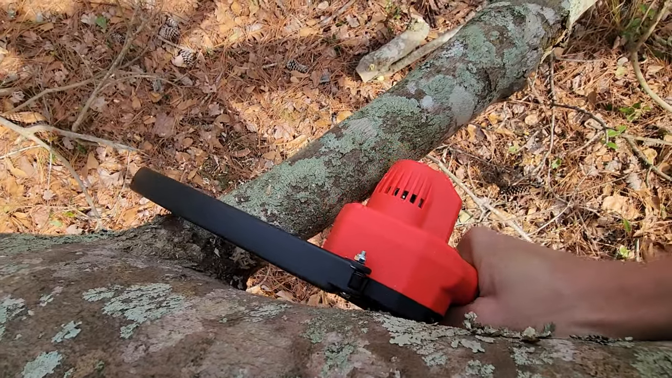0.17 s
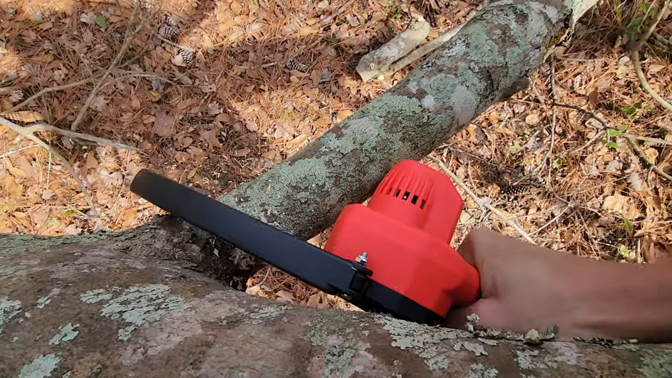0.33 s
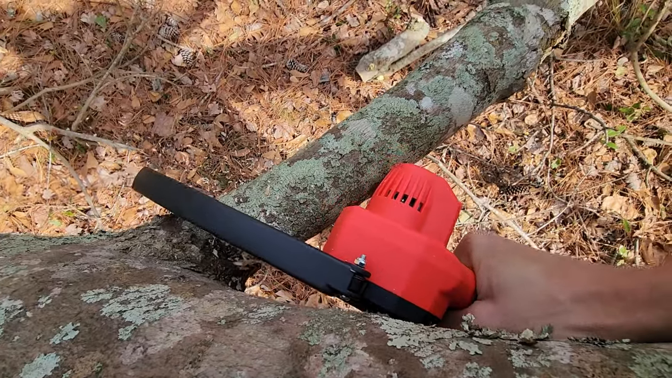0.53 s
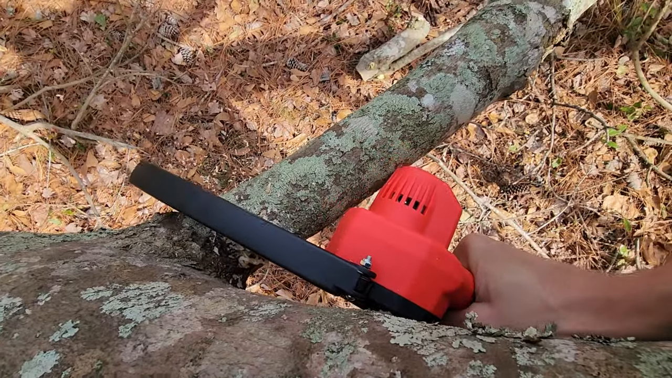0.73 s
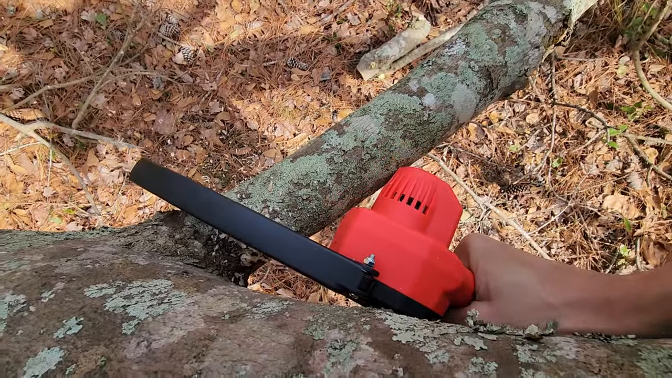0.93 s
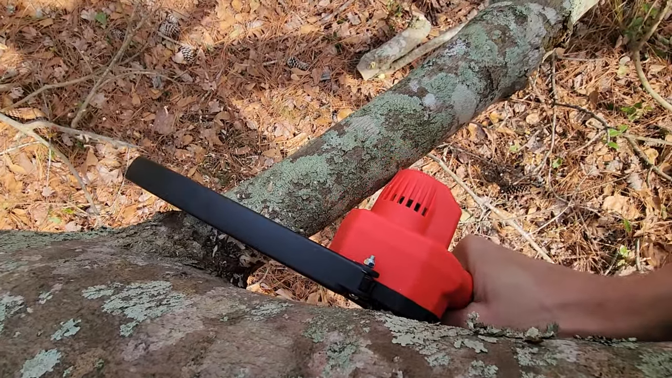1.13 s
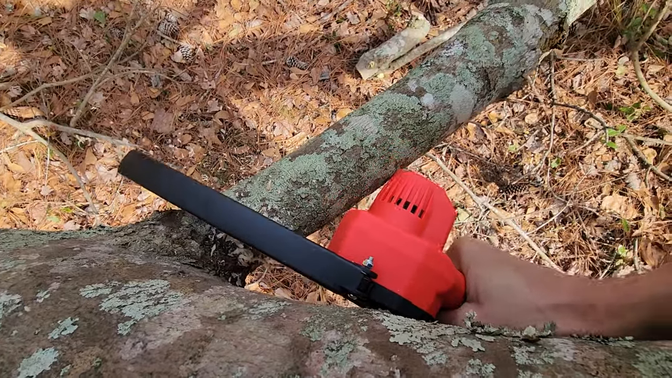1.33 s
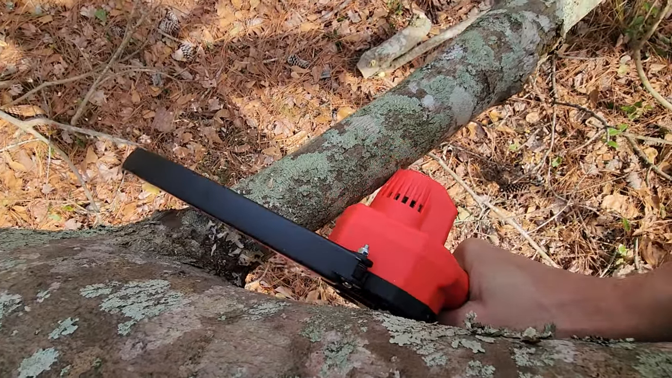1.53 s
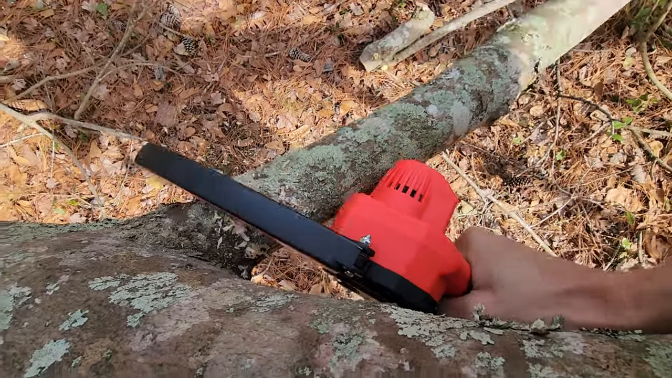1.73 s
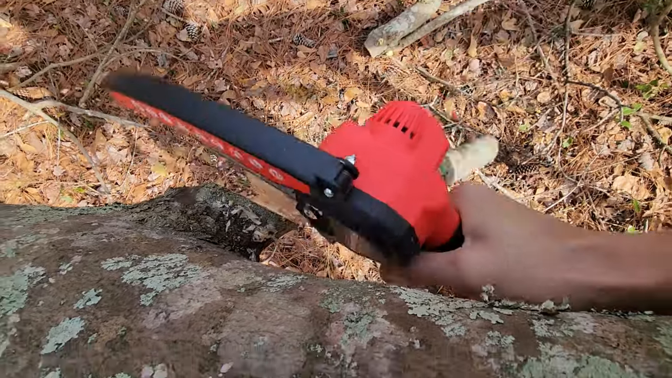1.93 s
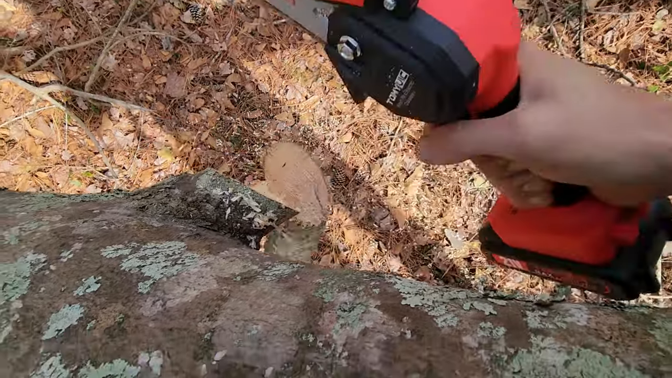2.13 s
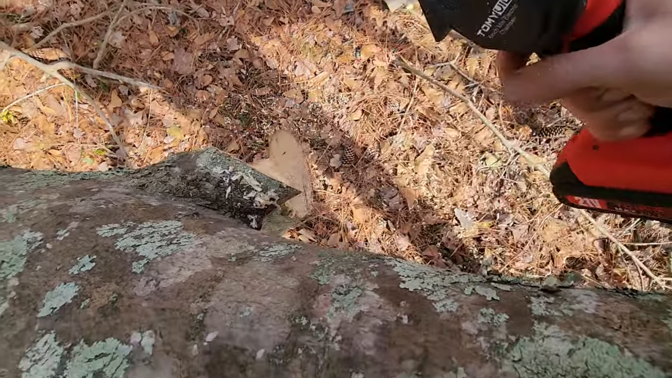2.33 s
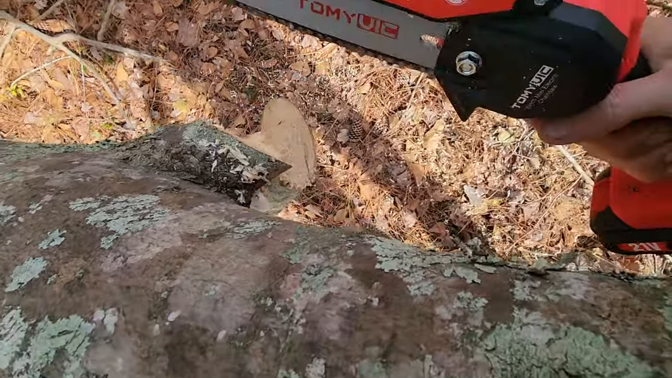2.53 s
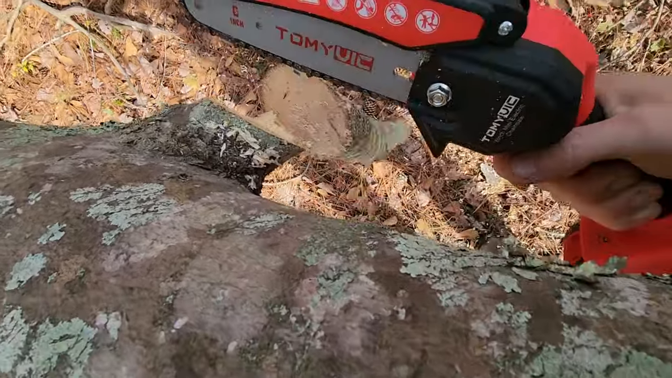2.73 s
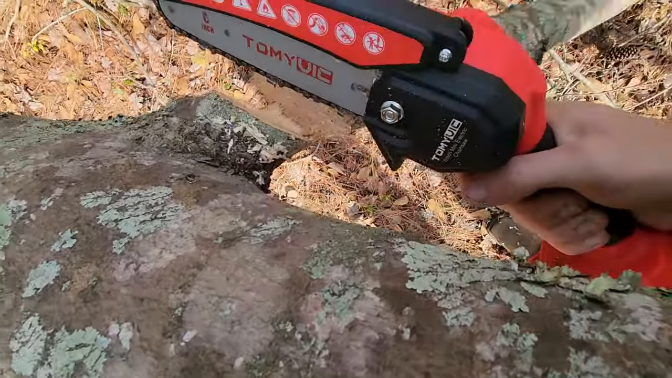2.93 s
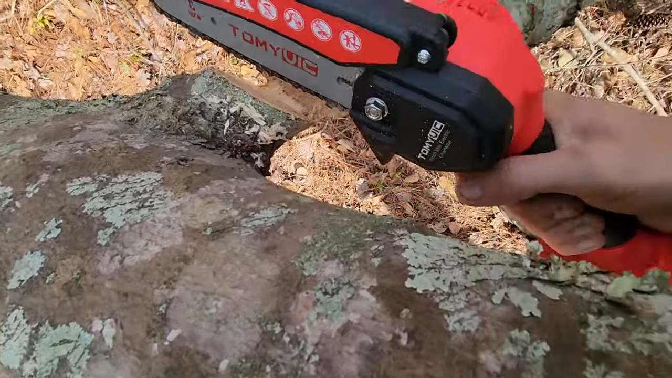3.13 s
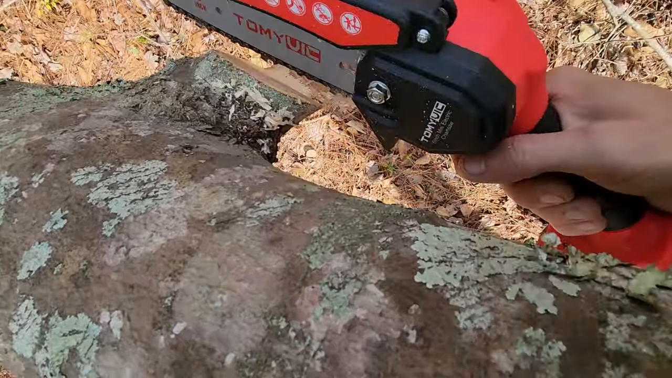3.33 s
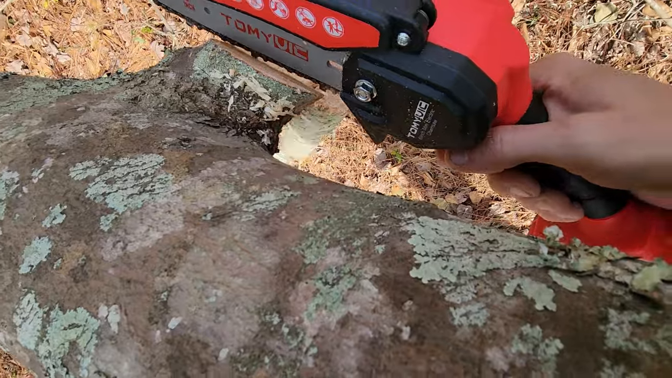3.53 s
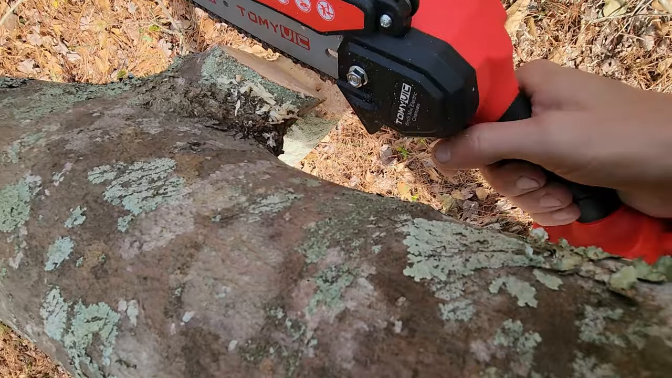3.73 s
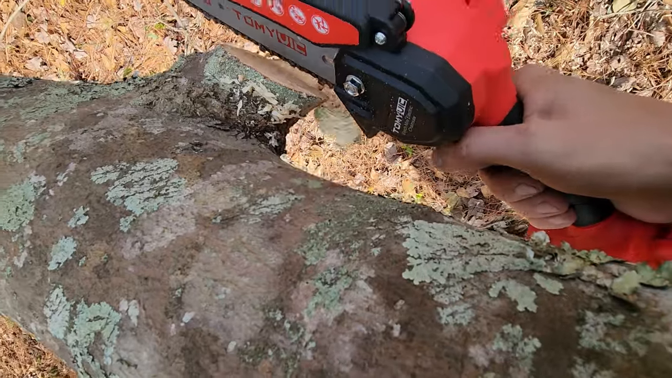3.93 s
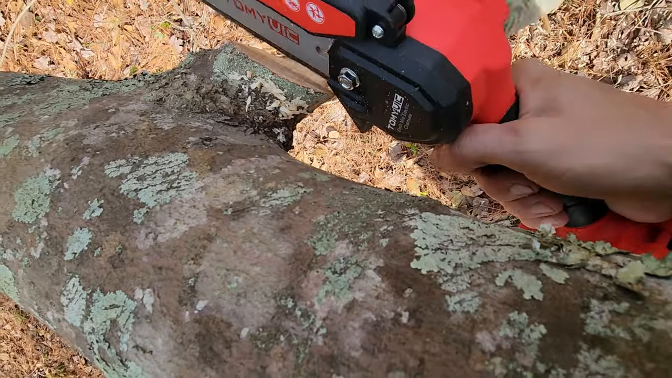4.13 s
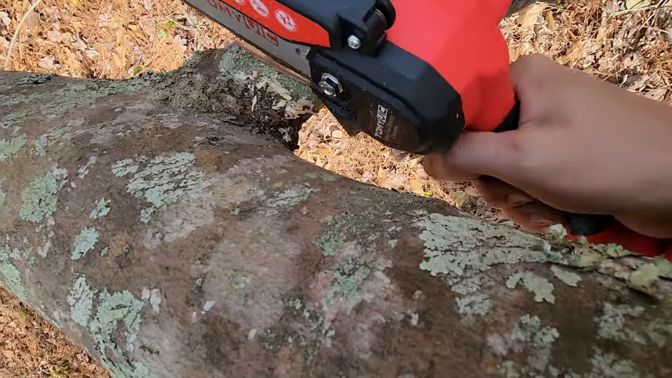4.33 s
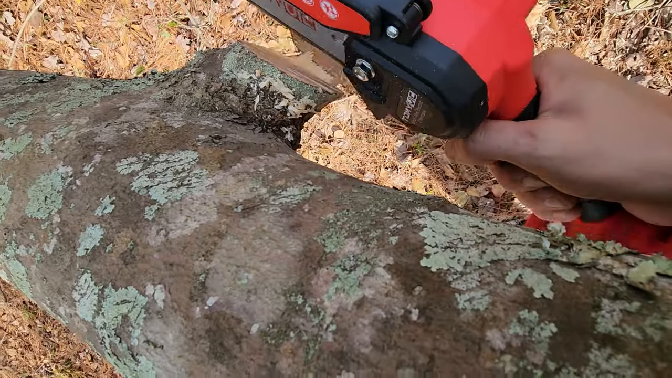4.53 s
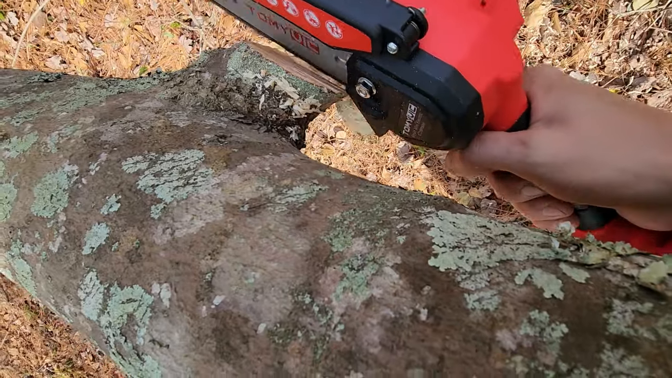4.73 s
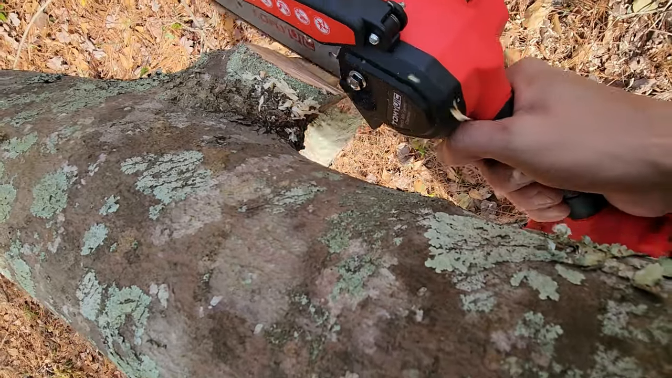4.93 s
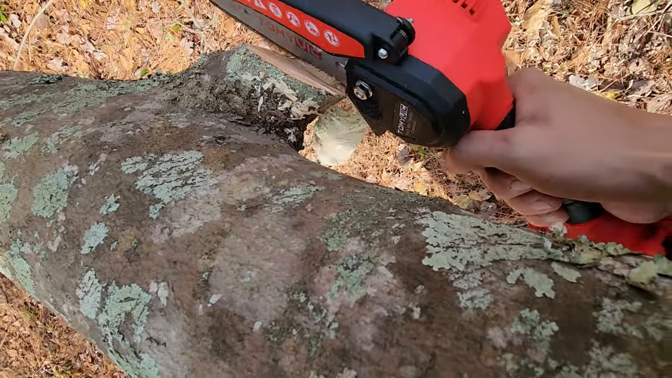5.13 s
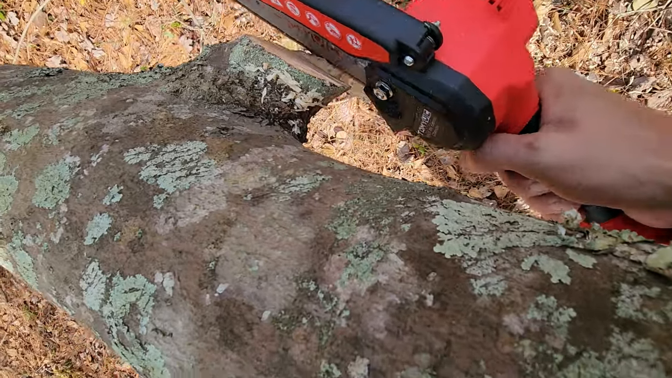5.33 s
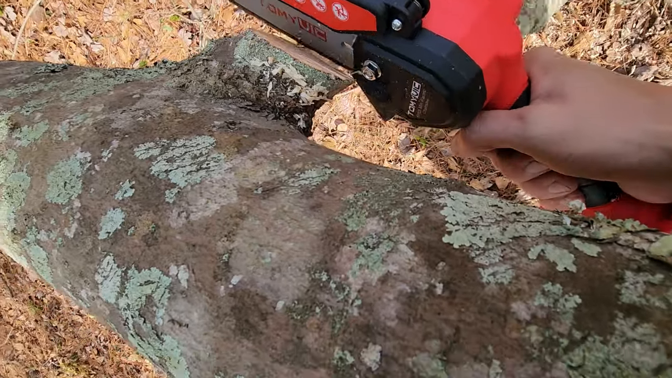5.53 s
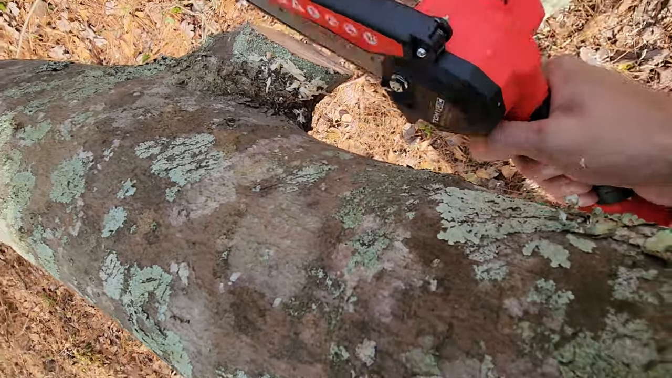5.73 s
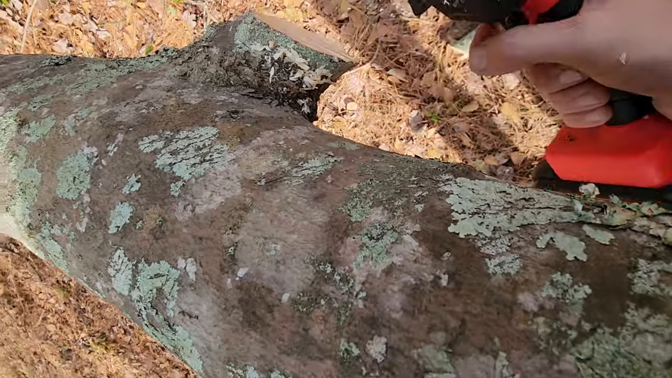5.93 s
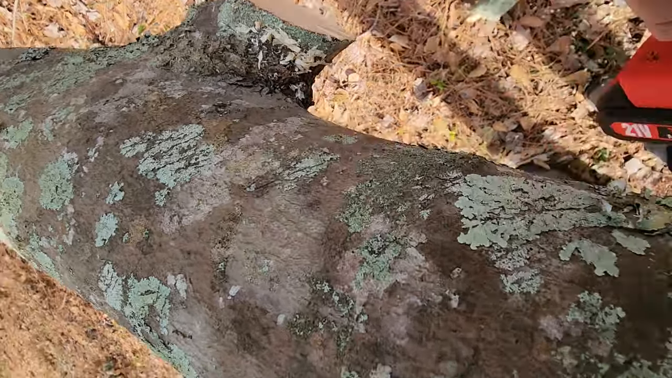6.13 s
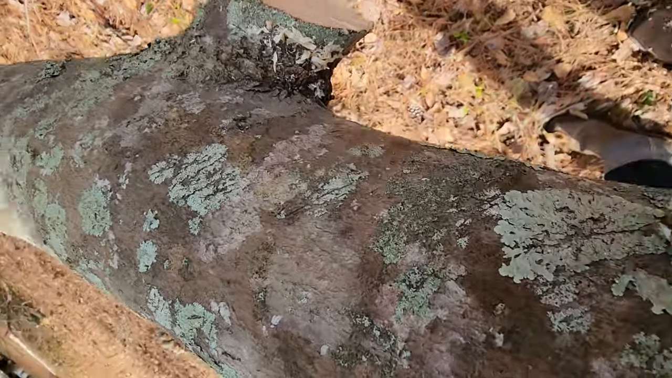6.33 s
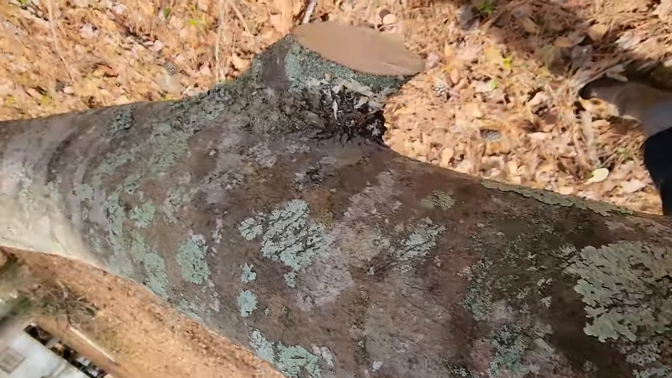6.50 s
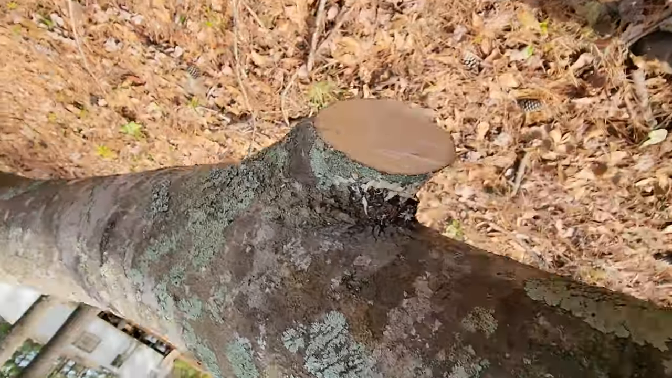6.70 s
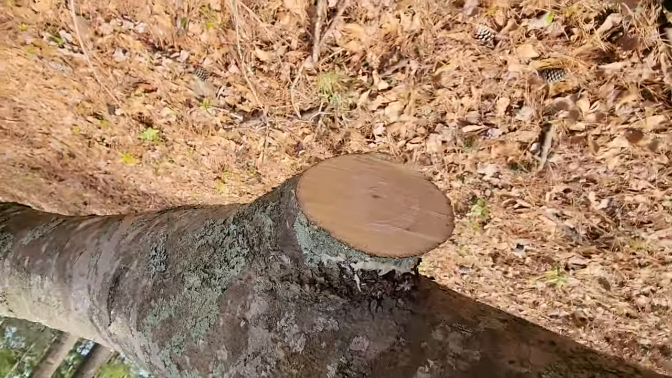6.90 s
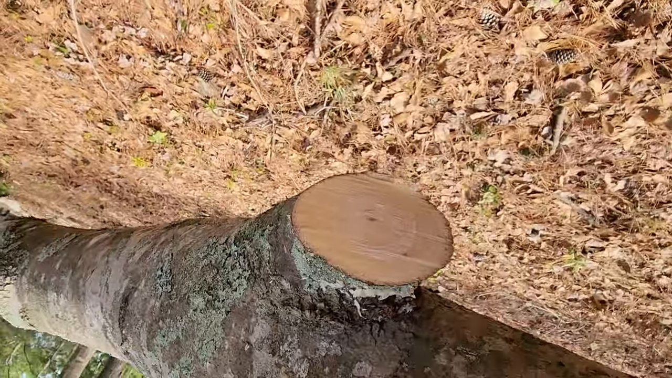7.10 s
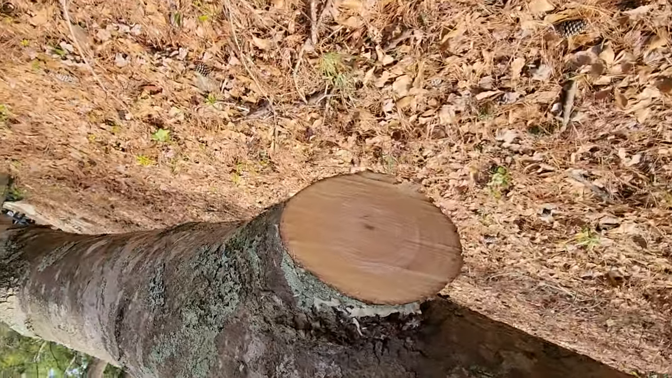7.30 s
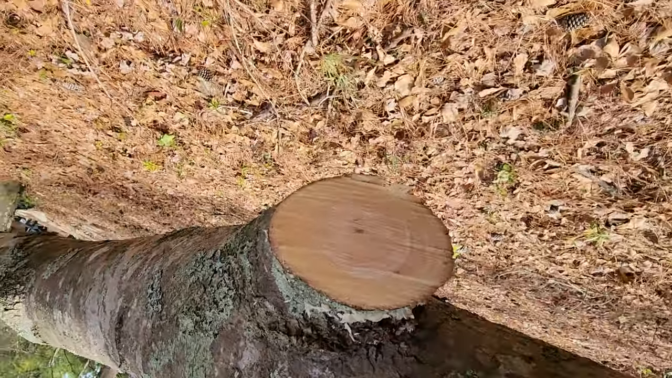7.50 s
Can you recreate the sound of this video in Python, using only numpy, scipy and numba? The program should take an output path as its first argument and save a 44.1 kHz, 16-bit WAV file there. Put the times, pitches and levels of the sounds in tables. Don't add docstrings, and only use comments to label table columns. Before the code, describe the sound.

Close battery saw roars and squeals in wood, winds down, pauses quietly, kicks through a second cut with a thump, then leaves and twigs crunch.

```python
import sys
import numpy as np
from scipy import signal
from scipy.fft import rfft, irfft, next_fast_len
from scipy.io import wavfile
from scipy.ndimage import uniform_filter1d
from numba import njit

SR = 44100
rng = np.random.default_rng(int(sys.argv[2]) if len(sys.argv) > 2 else 0)


def unload_wav(signal):
    wavfile.write(
        sys.argv[1],
        SR,
        np.round(np.clip(np.atleast_2d(signal).T, -1, 1) * 32767).astype(np.int16),
    )


def voltage_ratio(level):
    return 10 ** (np.asarray(level, float) / 20)


N = 337806
T = np.arange(N) / SR
SIZE = next_fast_len(N + SR // 10)
FREQ = np.maximum(np.arange(SIZE // 2 + 1) * SR / SIZE, 1)

# frequency in Hz, level per hertz in dB.
BURIED_COLOUR = [(18, -45), (30, -11), (145, -6), (174, -1.5), (437, -12.5), (616, -4.5), (913, -7),
                 (1910, -5.5), (2540, -11.5), (2980, -9.5), (3980, -11.5), (6380, -8.5), (8980, -20),
                 (11700, -9), (16000, -14)]
# frequency in Hz, level per hertz in dB.
FREE_COLOUR = [(18, -38.5), (30, -8), (100, -5.5), (210, -10.5), (252, -8), (404, -8.5), (702, 4),
               (1350, 6), (1720, 0.5), (2120, -2), (2830, -11), (5600, -8.5), (7470, -8), (9460, -13.5),
               (12600, 1.5), (16000, -3.5)]
# frequency in Hz, width in Hz, level in dB.
HOUSING = [(847, 200, -1.5), (1397, 220, 2), (2087, 280, 2), (4270, 120, 1.5), (6200, 230, -5.5),
           (7450, 580, -7)]
# time in seconds, tone in Hz,
# level in dB.
ROUGH_TONE = [(0.0, 1340, -23.5), (0.102, 1770, -39), (0.55, 1984, -26), (1.1, 1755, -36), (1.45, 1950, -34),
              (1.55, 1400, -27), (1.64, 1185, -28), (1.82, 1410, -27.5), (1.95, 2100, -43.5)]
# frequency in Hz, 60 dB decay in seconds, level in dB.
LOG_MODES = [(65, 0.25, 0.5), (105.5, 0.098, 11.5), (169, 0.22, 1.5), (247, 0.18, -0.5)]
# time in seconds, peak in dB, knock minus thud in dB.
KICKS = [(0.201, -21.5, -2.5), (0.256, -19.5, 11), (0.799, -34.5, 12.5), (1.205, -31, 11), (1.386, -30, 6),
         (1.78, -21.5, 8.5), (3.644, -42, -20), (4.148, -36, 17), (4.197, -26, -8.5), (4.298, -21.5, 3.5),
         (4.358, -52, 0.5), (4.423, -23, 7), (4.568, -28, 11.5), (4.816, -25.5, -3), (4.95, -31, 11),
         (5.001, -20.5, 7), (5.136, -22.5, 13), (5.389, -31, 1.5), (5.617, -22, 9.5), (5.639, -27.5, -4.5),
         (5.668, -28, 0.5), (5.7, -21.5, 2), (5.85, -27.5, -3), (5.939, -58, 19)]
# frequency in Hz, level per hertz in dB.
LEAVES_COLOUR = [(240, -44), (598, -10.5), (1160, -10), (1960, -10), (2600, -15.5), (3900, -6.5),
                 (7170, -2.5), (9920, -34), (12100, -2.5), (16000, -18)]
# frequency in Hz, level per hertz in dB.
WOODS_COLOUR = [(120, -33.5), (200, 5), (468, -2.5), (655, -6.5), (832, -4), (1020, -11.5), (1770, -16.5),
                (2120, -12), (2500, -26.5), (3500, -19.5), (4550, -57.5), (7700, -120)]
# frequency in Hz, likeness from 0 to 1.
LIKENESS = [(60, 0.94), (130, 0.9), (290, 0.8), (640, 1), (1410, 0.8), (3100, 0.6), (6820, 0.5), (15000, 0)]
# frequency in Hz, left minus right in dB.
PORTS = [(60, -0.5), (110, -4), (200, -5.5), (380, -6), (700, -1.5), (1290, -7), (2380, -4.5), (4400, -9),
         (8120, 1), (15000, 5)]
# time in seconds, spread in seconds, level in dB.
SCRAPES = [(3.02, 0.069, -74), (3.16, 0.012, -57.5), (3.68, 0.045, -72.5), (4.08, 0.04, -59.5)]
# time in seconds, sprocket turns in Hz.
LABOUR = [(0, 36), (.04, 38), (.1, 42.5), (.2, 43.2), (.3, 42.4), (.5, 47.7), (.62, 44), (.7, 43.4),
          (.8, 45.5), (1.15, 44.7), (1.3, 42.6), (1.37, 48.3), (1.45, 47.5), (1.55, 35), (1.64, 29),
          (1.72, 32), (1.82, 33.5), (1.92, 57)]
# time in seconds, sprocket turns in Hz.
RESTART = [(4.13, 57), (4.14, 20), (4.165, 35), (4.185, 48), (4.21, 54), (4.24, 60), (4.29, 53), (5.9, 56)]
# time in seconds, nearness in dB, push into the log in dB.
HAND = [
    [(0.0, 3, 8), (0.35, 1, 10.5), (1.1, 0, -2), (1.29, 0, 1), (1.37, -1, -0.5), (1.64, 1, 1.5),
     (1.75, 2.5, 7.5), (1.92, -2.5, 1), (2.11, -2, -4.5)],
    [(4.14, 7, -6), (4.2, 2, -23), (4.32, 2, 1.5), (4.66, 0.5, -3), (5.11, 1, 0), (5.48, 0.5, -1.5),
     (5.67, 0.5, -5), (5.8, -1, 1.5), (6.0, -1, -4)],
]
# low edge in Hz, high edge in Hz, buried level in dB,
# free level in dB, loss per halved speed in dB, turns a second below which it falls silent.
PARTS = [(370, 2570, -20, -23, 6.5, 1.6), (2663, 4930, -24, -20.5, 8, 10.5),
         (5620, 8120, -21, -23.5, 7, 17), (8600, 22200, -21, -20, 12.5, 15),
         (34, 400, -36, -41.5, 4.5, 1.5)]
# time in seconds, spread in seconds, level in
# dB.
PLATE_RINGS = [(.5, 0.058, -18.5), (2.3, 0.11, -27), (.82, 0.017, -26), (1.01, 0.12, -20),
               (1.39, 0.079, -19), (1.71, 0.035, -26), (1.86, 0.0064, -33)]
# time in seconds, spread in seconds, level in dB.
FREED_RASP = [
    (2.03, 0.072, -19),
]
# time in seconds, peak in dB, frequency in Hz, body minus peak in dB.
GRIT = [(2.837, -20.5, 6030, -2), (2.902, -28.5, 6200, -19), (2.927, -32, 2960, -8),
        (3.157, -29.5, 2660, -9.5), (3.169, -39, 7370, -7.5), (3.383, -43, 5360, -10),
        (3.512, -46, 5260, -18.5), (3.631, -22.5, 6300, -15.5), (3.636, -22, 3980, -7.5),
        (3.704, -42, 2210, -7), (3.766, -29, 6600, -1), (3.785, -16, 5830, -23), (3.824, -17.5, 3250, -18),
        (3.834, -20, 6800, -10.5), (4.062, -50, 7600, -13), (4.122, -30.5, 8000, -17.5)]
# time in seconds, peak in dB, frequency in Hz, body minus peak in dB.
TWIGS = [(6.651, -19, 5290, -19), (6.691, -28, 4100, -24), (6.731, -26, 3860, -6.5),
         (6.756, -22, 4240, -24), (6.88, -34, 6700, -25), (6.963, -33, 7210, -9), (7.005, -27, 6880, -19),
         (7.144, -31.5, 5000, -14), (7.18, -21.5, 6440, -10.5), (7.216, -29, 6190, -29),
         (7.275, -31, 6330, -29), (7.311, -41, 4770, -26), (7.389, -35, 7050, -34),
         (7.423, -37.5, 4820, -33), (7.44, -47, 5500, -30), (7.47, -40, 7200, -28.5),
         (7.479, -45, 7000, -30), (6.712, -40, 4200, -20), (7.062, -40, 6500, -25)]
# start in seconds, end in seconds, level in dB, crisp top in dB.
RUSTLES = [(2.828, 2.875, -50, -67), (2.9, 3.23, -79.5, -94.5), (4.074, 4.142, -71, -90),
           (6.6, 6.79, -56, -68), (6.858, 6.999, -50, -54), (7.06, 7.123, -60.5, -62),
           (7.173, 7.316, -52, -58), (7.398, 7.66, -72.5, -86)]
# time in seconds, spread in seconds, level in dB.
MOAN = [(3.05, 0.16, -61), (6.95, 0.28, -67.5), (7.6, .03, -79)]
# time in seconds, spread in seconds, level in dB.
GUSTS = [(2.9, .1, -56.5), (3.17, .08, -55.5), (3.82, 0.067, -54), (4.08, 0.083, -59), (6.75, 0.12, -58),
         (7.0, .25, -65), (7.57, .04, -55.5)]

START_S, RELEASES_S = 4.14, (2.1, 5.95)
COAST_S = (0.78, 0.72)
FREE_HZ, STALL_HZ = 60, 25
BREAKS_S, OPENS_S = 1.8, 0.12
SURGE_DB, SURGE_S = 6, 0.1
PLATE_HZ = 6390
DROP_S, DROP_SPREAD_S, DROP_HZ, DROP_DB = 5.853, 0.008, 100, -14
REST_DB = 16.5
STILL_DB, LEAVES_PAN_DB = -76.5, -10.5
SAW_LEAD, GROUND_LEAD = 5, -4


def curves(tables):
    rows = np.vstack(tables)
    s, *columns = rows[np.argsort(rows[:, 0])].T
    return [np.interp(T, s, column) for column in columns]


def along(table):
    hz, value = np.transpose(table)
    return np.interp(np.log(FREQ), np.log(hz), value)


def shape(x, gain):
    return irfft(rfft(x, SIZE) * gain, SIZE)[..., :N]


def unit(x):
    return x / np.sqrt(np.mean(x ** 2))


def band(lo_hz, hi_hz):
    return 1 / np.sqrt((1 + (lo_hz / FREQ) ** 12) * (1 + (FREQ / hi_hz) ** 12))


def noise():
    return rng.standard_normal((3, N))


def walk(rate):
    hold = int(SR / rate)
    steps = np.repeat(rng.standard_normal(N // hold + 1), hold)
    return uniform_filter1d(steps, hold)[:N] * 1.2


def pan(db):
    return voltage_ratio(np.array([0 * db, db / 2, -db / 2]).reshape(3, -1))


def swells(rows):
    return sum(voltage_ratio(db - 6.0 * ((T - s) / spread) ** 2) for s, spread, db in rows)


def by_run(pair):
    return np.where(T < START_S, *pair)


@njit
def moving_band(x, hz, width):
    y, mid, low = np.empty(len(x)), 0., 0.
    for i in range(len(x)):
        g, k = np.tan(np.pi * hz[i] / SR), width / hz[i]
        v = (mid + g * (x[i] - low)) / (1 + g * (g + k))
        mid = 2 * v - mid
        low += 2 * g * v
        y[i] = k * v
    return y


def ringing(hz, width_hz, flutter_db, pan_db):
    hz = hz * (1 + 0.027 * walk(40))
    rows = [moving_band(moving_band(row, hz, width_hz), hz, width_hz) for row in noise()]
    return unit(np.array(rows)) * voltage_ratio(flutter_db * walk(45)) * pan(pan_db)


def speed():
    coast_s = np.maximum(T - by_run(RELEASES_S), 0)
    left = np.clip(1 - coast_s / by_run(COAST_S), 0.04, 1)
    return np.minimum(curves([LABOUR, RESTART])[0], FREE_HZ * left), coast_s


def buried_share():
    return np.clip(1 - (T - BREAKS_S) / OPENS_S, 0, 1)


def mix(pair):
    buried = buried_share()
    return buried * pair[0] + (1 - buried) * pair[1]


def coasting_share():
    return np.clip(speed()[1] / 0.25, 0, 1)


def restart_surge():
    return SURGE_DB * (T >= START_S) * np.exp(-np.abs(T - START_S) / SURGE_S)


def housing_gain(hz):
    return np.sqrt(1 + sum((voltage_ratio(db) / (1 + (2 * (hz - f) / w) ** 2)) ** 2 for f, w, db in HOUSING))


def gear_levels(push_db):
    turns_hz, coast_s = speed()
    buried, coasting, surge_db = buried_share(), coasting_share(), restart_surge()
    creep = np.clip(1 - turns_hz / STALL_HZ, 0, 1)
    strain_db = 2.4 * buried * np.maximum(39 - turns_hz, 0)
    load_db = 0.4 * buried * push_db
    bite_db = 14 * (T >= START_S) * np.exp(-((T - START_S - 0.04) / 0.04) ** 2)
    ring_out_db = by_run((10, 12.5)) * coasting
    pinch_db = -4 * buried * np.clip((T - 1.33) / 0.065, 0, 1)
    motor_db = mix((-30, -36.5)) + load_db + bite_db + 0.22 * surge_db - 0.7 * strain_db - 54 * coast_s
    mesh_db = mix((-37.5, -45)) + 0.1 * strain_db + bite_db + 2.2 * surge_db + ring_out_db - 20 * creep ** 2
    whine_db = mix((-33, -46.5)) + pinch_db + load_db - strain_db - 18 * creep ** 2
    whine_db += ring_out_db * np.clip(2.8 - turns_hz / 15, -0.2, 1.05)
    return motor_db, mesh_db, whine_db


def gears(push_db):
    turns_hz, _ = speed()
    buried, coasting = buried_share(), coasting_share()
    motor_db, mesh_db, whine_db = gear_levels(push_db)
    waver = 1 + (0.005 * buried + 0.006 * coasting) * walk(60)
    lines = [(13.9, motor_db - 3 + 2 * buried, 1, 900),
             (40.7, mesh_db - 5, -3, 2600),
             (66, whine_db - 1 + 4.5 * buried, 6, 3200),
             (114, mesh_db - 2, 0, 1700)]
    out = 0
    for order, db, pan_db, top_hz in lines:
        jitter_hz = (19 + 8 * coasting + 0.016 * order * turns_hz * buried) * walk(450)
        hz = order * turns_hz * waver + jitter_hz
        phase = 2 * np.pi * (np.cumsum(hz) / SR + np.array([[0], [1], [-1]]) / 8)
        bloom = housing_gain(hz) ** 2.3 / 1.15 / (1 + (hz / top_hz) ** 8)
        bloom /= 1 + (min(top_hz / 3, 560) / np.maximum(hz, 1)) ** 4
        flutter_db = 2.4 * walk(60) + 1.6 * buried * walk(9) + 1.2 * coasting * walk(28)
        out = out + np.sqrt(2) * np.sin(phase) * voltage_ratio(db + 1.5 + flutter_db) * bloom * pan(pan_db)
    return out


def part_levels(near_db, push_db):
    turns_hz, _ = speed()
    shaded_db = by_run((-2, -5)) * coasting_share()
    hand_db = [near_db + restart_surge() / 2, near_db + shaded_db, near_db, near_db, push_db]
    slowness = np.log2((turns_hz + 3.1) / FREE_HZ)
    levels = []
    for hand, (_, _, buried_db, free_db, slow_db, silent_hz) in zip(hand_db, PARTS):
        rest = np.clip(1 - turns_hz / (silent_hz * by_run((1.03, 0.73))), 0, 1)
        levels.append(hand + mix((buried_db, free_db)) + slow_db * slowness - REST_DB * rest)
    return levels


def saw():
    near_db, push_db = curves(HAND)
    turns_hz, coast_s = speed()
    buried, coasting = buried_share(), coasting_share()
    wobble_db = mix((0.6, 3)) + (4.5 - 3) * coasting
    turn = np.cumsum(turns_hz * (1 + 0.08 * walk(12))) / SR
    swell_db = 0.39 * wobble_db * (1.5 + 0.5 * walk(14)) * np.cos(2 * np.pi * turn)
    slap = voltage_ratio(swell_db + 0.5 * walk(16) + walk(70))
    clatter = noise() * slap * (1 + np.exp(-(6 * turn % 1) / 0.3)) * voltage_ratio(0.89 * walk(900))
    out = gears(push_db) * slap
    levels = part_levels(near_db, push_db)
    for (lo, hi, *_), db in zip(PARTS, levels):
        wood = unit(shape(clatter, voltage_ratio(along(BURIED_COLOUR)) * band(lo, hi)))
        air = unit(shape(clatter, voltage_ratio(along(FREE_COLOUR)) * housing_gain(FREQ) ** 0.95 * band(lo, hi)))
        out = out + voltage_ratio(db + 0.69 * walk(30)) * (np.sqrt(buried) * wood + np.sqrt(1 - buried) * air)
    plate = voltage_ratio(levels[2] + by_run((-7, 2))) * ringing(PLATE_HZ + 0 * T, 500., 3, -2)
    plate = plate * np.clip(1.5 - turns_hz / 32, 0, 1) * (1 - buried)
    plate += swells(FREED_RASP) * ringing(5000 + 0 * T, 1700.0, 2.6, 1.8)
    spin_up = np.where(T < START_S, 1, np.clip((T - START_S) / 0.0039, 0, 1))
    stop = np.clip((by_run(COAST_S) + by_run((0.02, 0.04)) - coast_s) / 0.04, 0, 1)
    dip = 1 - 0.33 * np.exp(-((T - DROP_S) / DROP_SPREAD_S) ** 2)
    return (out + plate) * spin_up * stop * dip * pan(0.76 + by_run((-2.5, -1.8)) * coasting)


def cut():
    tone_hz, tone_db = curves([ROUGH_TONE])
    out = voltage_ratio(tone_db) * ringing(tone_hz, 150., 1.6, -16.0)
    plate = ringing(PLATE_HZ + 0 * T, 500.0, 3.5, 0.98)
    out += voltage_ratio(-42) * plate
    for hz, db in [(62, -59.0), (108, -50.0), (180, -37.5)]:
        out += voltage_ratio(db) * ringing(hz + 0 * T, 16.0, 2.9, 0.)
    return out * np.clip((ROUGH_TONE[-1][0] - T) / 0.046, 0, 1) + plate * swells(PLATE_RINGS)


def woods():
    hush = unit(shape(noise(), voltage_ratio(along(WOODS_COLOUR)) * band(200, 3500)))
    hush = hush * voltage_ratio(-67.5 + by_run((0., -3.)) + walk(28))
    hum = voltage_ratio(-84) * np.sin(2 * np.pi * 1245 * T) * np.clip((3.5 - T) / 0.12, 0, 1)
    return hush + hum


def kicks():
    s, thud_db, knock_db = np.transpose(KICKS)
    blows, t = np.zeros((2, N)), T[:SR // 4]
    blows[:, (s * SR).astype(int)] = voltage_ratio([thud_db, thud_db + knock_db])
    modes = sum(voltage_ratio(db - 60 * t / t60) * np.sin(2 * np.pi * hz * t) for hz, t60, db in LOG_MODES)
    thud = signal.fftconvolve(blows[0], modes * (1 - np.exp(-t / 0.0035)))[:N] * voltage_ratio(-9.5)
    thud = shape(thud, band(60, 600))
    knock_decay = signal.fftconvolve(blows[1], voltage_ratio(-60 * t / 0.18))[:N]
    knock = knock_decay * unit(shape(noise(), band(140, 1200))) * voltage_ratio(-8.5)
    after_s = T - DROP_S
    drop = -voltage_ratio(DROP_DB) * np.cos(2 * np.pi * DROP_HZ * after_s) * np.exp(-(after_s / DROP_SPREAD_S) ** 2)
    return thud + knock + drop


def heard():
    return np.clip((speed()[1] - 0.7) / 0.069, 0, 1)


def wind():
    gust = voltage_ratio(-60) + swells(GUSTS)
    rumble = unit(shape(noise(), band(28, 150) * (60 / FREQ) ** 0.36)) * gust * voltage_ratio(-2 + 1.5 * walk(17))
    moan = (voltage_ratio(-86.0) + swells(MOAN)) * unit(shape(noise(), band(380, 520)))
    return (rumble + moan) * heard()


def leaves():
    s, end, loud_db, top_db = np.transpose(RUSTLES)[..., None]
    stir = np.clip((T - s) / 0.078 + 1, 0, 1) * voltage_ratio(-20 * np.maximum(T - end, 0) / 0.071)
    rustle = voltage_ratio(STILL_DB) + (voltage_ratio(loud_db) * stir).sum(0)
    crisp = voltage_ratio(STILL_DB - 23) + (voltage_ratio(top_db) * stir).sum(0)
    grains = (rng.random(N) < 700 / SR) * voltage_ratio(2.7 * rng.exponential(size=N))
    grains = signal.lfilter([1], [1, -np.exp(-1 / (0.0006 * SR))], grains)
    crackle = noise() * (unit(grains) + 0.99) * voltage_ratio(1.3 * walk(30)) * pan(LEAVES_PAN_DB - 0.5)
    colour = voltage_ratio(along(LEAVES_COLOUR))
    out = rustle * unit(shape(crackle, colour * band(300, 9500)))
    out += crisp * unit(shape(crackle, colour * band(10000, 17500)))
    return out * heard() + swells(SCRAPES) * unit(shape(crackle, band(460, 2500)))


def snaps():
    out, t = np.zeros((3, N + SR)), T[:SR // 20]
    body = signal.butter(2, [650, 1860], "band", fs=SR)
    edge = signal.butter(2, [10500, 17000], "band", fs=SR)
    for s, db, hz, body_db in GRIT + TWIGS:
        edge_db, pan_db = (-9, -8) if s < START_S else (-10, -12)
        edge_db += 7 * np.log2(hz / 5000)
        crack = rng.standard_normal((3, len(t)))
        resonance = signal.butter(1, [hz / 1.24, hz * 1.3], "band", fs=SR)
        ring = 2.0 * signal.lfilter(*resonance, crack)
        ring += voltage_ratio(edge_db + 9.0) * signal.lfilter(*edge, crack)
        snap = ring * (voltage_ratio(-60 * t / 0.0032) + voltage_ratio(-12.0 - 60 * t / 0.019))
        snap += voltage_ratio(body_db + 4.5) * signal.lfilter(*body, crack) * voltage_ratio(-60 * t / 0.032)
        onset = 1 - np.exp(-t / 0.0006)
        out[:, int(s * SR):][:, :len(t)] += voltage_ratio(db - 1) * snap * onset * pan(pan_db + 4)
    return out[:, :N]


def scene():
    tool = saw() + cut() + kicks()
    floor = woods() + wind() + leaves() + snaps()
    like = np.clip(along(LIKENESS), 0, 1)
    lean = voltage_ratio(along(PORTS) / 2)
    turn, back = (np.exp(2j * np.pi * FREQ * lead / SR / (1 + (FREQ / 2700) ** 2))
                  for lead in (SAW_LEAD, GROUND_LEAD))
    alike_power = like * np.abs(lean * turn + 1 / lean) ** 2
    apart_power = (1 - like) * (lean ** 2 + lean ** -2)
    mean = np.sqrt(alike_power + apart_power) / 2
    early = shape(tool[0], turn) + shape(floor[0], back)
    ports = [(early, tool[1] + floor[1], lean),
             (tool[0] + floor[0], tool[2] + floor[2], 1 / lean)]
    return np.array([shape(shared, np.sqrt(like) * gain / mean) + shape(own, np.sqrt(1 - like) * gain / mean)
                     for shared, own, gain in ports])


def low_pass(x):
    return signal.sosfilt(signal.butter(12, 16670, fs=SR, output="sos"), x)


def record(dry):
    top_hz = 15850
    limited = np.tanh(0.74 * dry) / 0.86
    finished = shape(limited, band(8, 2 * top_hz) / (1 + (FREQ / top_hz) ** 180))
    return low_pass(finished)


dry = scene()
out = record(dry)
unload_wav(out)
```